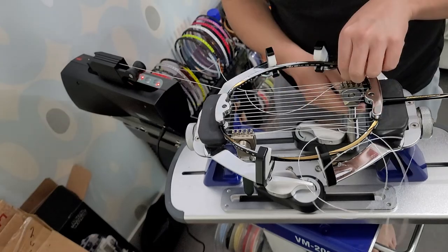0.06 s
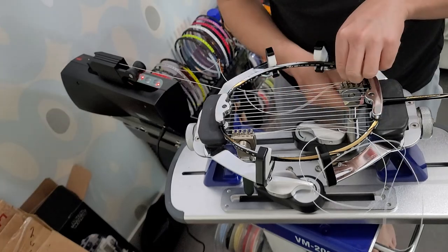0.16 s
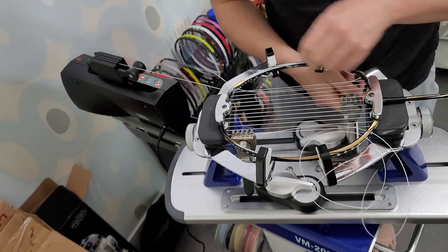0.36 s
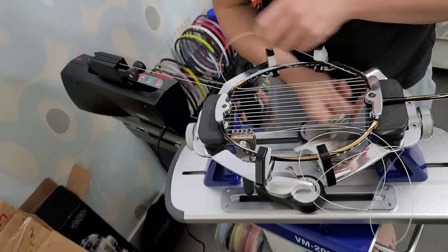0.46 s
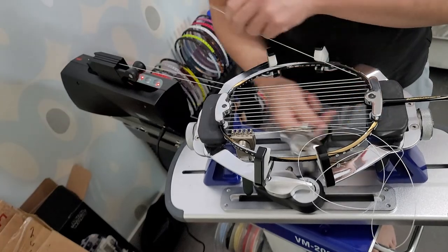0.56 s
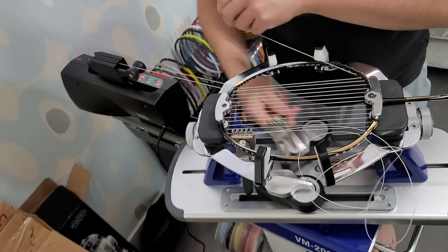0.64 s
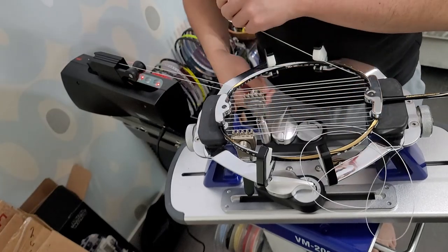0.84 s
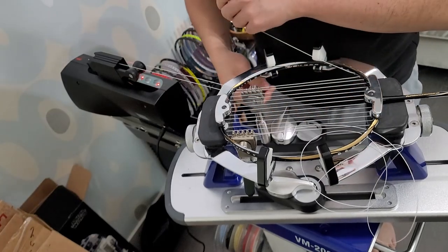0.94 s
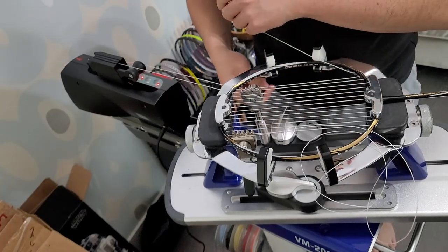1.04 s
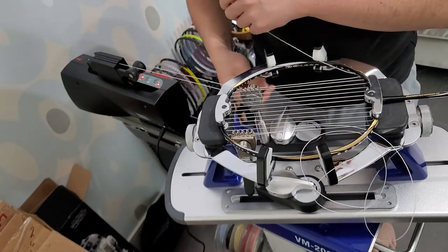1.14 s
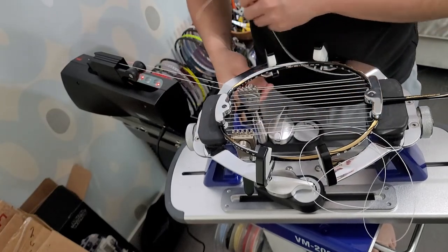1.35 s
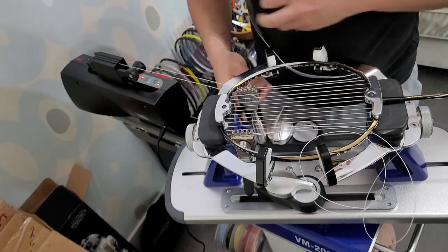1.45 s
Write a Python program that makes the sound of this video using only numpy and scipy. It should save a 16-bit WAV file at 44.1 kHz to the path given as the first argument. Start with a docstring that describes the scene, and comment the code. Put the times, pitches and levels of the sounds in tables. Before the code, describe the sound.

A metal clamp on a racket stringing machine snaps open at about 0.2 seconds, with a brief creak and ring from the racket. Around 0.35 seconds it clacks loudly, drops and rattles until 0.5. A lighter clink comes at 0.6, then soft hand bumps and faint sliding string near 0.8. Small ticks follow until 1.3 seconds, and the string slides again. A low rumble continues in the small hard room.

```python
"""A string clamp on a racket stringing machine is released and moved, in a small hard room.
Over a steady low rumble, string slides through the fingers and the racket creaks. The jaws rub, snap
open, and the racket springs back. The base lock lets go; the clamp drops, rattles on the turntable and
clinks as it is lifted. A hand bumps the racket, the clamp ticks against the strings as it is set again,
and the string slides once more. Impacts ring the modes of each part; friction makes swells of noise."""
import sys
import numpy as np
from scipy import signal
from scipy.fft import rfft, irfft
from scipy.io import wavfile
from scipy.ndimage import uniform_filter1d

SR = 44100
rng = np.random.default_rng(int(sys.argv[2]) if len(sys.argv) > 2 else 0)


def int16_out(signal):
    """Quantize to a 16-bit WAV file."""
    q = np.round(np.clip(np.atleast_2d(signal).T, -1, 1) * 32767)
    wavfile.write(sys.argv[1], SR, q.astype(np.int16))


N = 66150
TIME, FREQ = np.arange(N) / SR, np.fft.rfftfreq(N, 1 / SR)
NEAR_LAG_S, FAR_LAG_S = 0.00014, -0.000615  # delay of the left channel for each end of the racket


def undb(db):
    """The decibel scale: 20 dB is a tenfold amplitude."""
    return 10 ** (np.asarray(db) / 20)


def unit(x):
    """Normalisation: each channel gets an energy of one."""
    return x / np.sqrt(np.sum(x ** 2, axis=-1, keepdims=True))


def fade(t60):
    """Exponential damping: 60 dB in t60 seconds."""
    return np.exp(-np.log(1000) * TIME / max(t60, 1e-4))


def convolve(drive, response):
    """Linear response: the drive convolved with an impulse response."""
    return signal.fftconvolve(np.atleast_2d(drive), np.atleast_2d(response), axes=-1)[:, :N]


def colour(x, points):
    """Minimum-phase filtering through (Hz, dB) points."""
    hz, db = np.array(points).T
    gain = undb(np.interp(np.log(FREQ + 1), np.log(hz), db))
    cepstrum = irfft(np.log(gain), N)
    cepstrum[1:N // 2] *= 2
    cepstrum[N // 2:] = 0
    return irfft(rfft(x) * np.exp(rfft(cepstrum)), N)


def whiten(x, envelope):
    """Spectral whitening of noise under an envelope."""
    x = x * envelope
    for _ in range(2):
        spectrum = rfft(x)
        x = irfft(spectrum / (abs(spectrum) + 1e-12), N) * np.sqrt(envelope)
    return unit(x)


BASS_SHARED_HZ = 270
def share_bass(x):
    """Spatial coherence: long waves reach both channels alike."""
    alike = 1 / (1 + (FREQ / BASS_SHARED_HZ) ** 4)
    left, right = rfft(x)
    return np.array([x[0], irfft(np.sqrt(alike) * left + np.sqrt(1 - alike) * right, N)])


def diffuse():
    """A diffuse field: noise from all around, coherent only in the bass."""
    return share_bass(rng.standard_normal((2, N)))


RISE_S = 0.00057  # time constant of a blow spreading through a part
def body(modes, points, dense_db, dense_t60, split=.036):
    """Modal superposition: clusters of nine close modes beat over a short, dense ring."""
    swell = 1 - np.exp(-(TIME + 1 / SR) / RISE_S)
    dense = whiten(rng.standard_normal((2, N)), swell * fade(dense_t60))
    ring = undb(dense_db) * unit(colour(share_bass(dense), points))
    t = TIME[:N // 3]
    for hz, db, t60 in modes:
        phase = rng.uniform(-np.pi, np.pi, (9, 2, 1)) * min(hz / BASS_SHARED_HZ / 2, 1) ** 2
        offsets_hz = (split * hz + 6) * (np.linspace(-1, 1, 9) + rng.uniform(-.12, .12, 9))
        cluster = np.sin(2 * np.pi * (hz + offsets_hz[:, None, None]) * t + phase).sum(axis=0)
        ring[:, :len(t)] += undb(db) * unit(cluster * (swell * fade(t60))[:len(t)])
    return unit(ring)


def place(x, start, db):
    """Delay and gain: the level is that of a unit energy spread over 10 ms."""
    delayed = np.pad(x, ((0, 0), (int(max(start, 0) * SR), 0)))[:, :N]
    return delayed * undb(db) * np.sqrt(SR / 100)


def blows(hits, chatter_db):
    """Contact force: an impulse, then surface chatter falling by 1/e in each contact time."""
    force = 0
    for start, db, contact_s in hits:
        envelope = np.exp(-TIME / max(contact_s, 1e-4))
        push = undb(chatter_db) * rng.standard_normal((1, N)) / np.linalg.norm(envelope)
        push[0, 0] += 1
        force = force + place(whiten(push, envelope), start, db)
    return force


def rub(swells, points):
    """Friction noise in Gaussian swells, each width a standard deviation."""
    swell = sum(undb(db) * np.exp(-.5 * ((TIME - middle) / width) ** 2) for middle, width, db in swells)
    return swell * unit(colour(diffuse(), points)) * np.sqrt(N)


def locate(x, lag_s, pan_db):
    """Binaural cues: the delay and level of the left channel relative to the right."""
    left = np.interp(TIME - lag_s, TIME, x[0], left=0)
    return np.array([left * undb(pan_db / 2), x[1] * undb(-pan_db / 2)])


# Spectrum of the room noise. Each row: frequency in Hz, level in dB.
RUMBLE_SPECTRUM = [(20, -15.5), (42, -18.5), (68, 4), (100, -16), (200, -7), (400, -8), (800, -15),
                   (1600, -21.5), (3000, -32.5), (6000, -32.5), (8500, -46), (16000, -44)]
def rumble():
    """Stationary noise: a diffuse field, strongest in the bass."""
    return undb(-57) * np.sqrt(N) * unit(colour(diffuse(), RUMBLE_SPECTRUM))


# Slides of the string. Each row: middle in seconds, width in seconds, level in dB.
SLIDE_SWELLS = [(0, 0.048, -51.5), (.79, 0.081, -53), (1.456, 0.069, -56.5)]
# Their spectrum. Each row: frequency in Hz, level in dB.
SLIDE_SPECTRUM = [(100, 11), (300, -11.5), (900, -4.5), (2000, -8), (5500, -12.5), (8500, -22.5),
                  (12000, -24), (16000, -70)]
def string_slides():
    """Sliding friction: the string runs through the fingers."""
    return rub(SLIDE_SWELLS, SLIDE_SPECTRUM)


# Creaks, then the recoil. Each row: start in seconds, level in dB, contact time in seconds.
RACKET_BLOWS = [(.1698, -59.5, .002), (.2052, -49, .005), (.2245, -43, .003), (.2522, -26, 0.0035)]
# Modes of frame and string bed. Each row: frequency in Hz, energy share in dB, t60 in seconds.
RACKET_RESONANCES = [(254.9, -11, 1), (424, -10, 0.5), (798, -7, .12), (1644, -7, 0.081)]
# Their dense ring. Each row: frequency in Hz, level in dB.
RACKET_SPECTRUM = [(150, -24), (400, -2), (1400, 0), (2400, -1), (6000, -6), (12000, -23)]
def racket_recoil():
    """Elastic recoil: the racket creaks, then springs back as the string is freed."""
    force = blows(RACKET_BLOWS, chatter_db=-4.5)
    ring = body(RACKET_RESONANCES, RACKET_SPECTRUM, dense_db=0.5, dense_t60=.03, split=.018)
    return convolve(force, ring)


# Scrapes of the jaws. Each row: middle in seconds, width in seconds, level in dB.
SCRAPE_SWELLS = [(.221, 0.019, -45), (1.0, 0.012, -59)]
# Their spectrum. Each row: frequency in Hz, level in dB.
SCRAPE_SPECTRUM = [(100, -25), (280, -22.5), (430, -1.5), (600, -6), (800, 3.5), (1100, -9), (2500, -20.5),
                   (6000, -32.5), (16000, -56.5)]
def jaw_scrapes():
    """Sliding friction: the jaws rub briefly on the string."""
    return rub(SCRAPE_SWELLS, SCRAPE_SPECTRUM)


# Snaps of the jaws. Each row: start in seconds, level in dB, contact time in seconds.
JAW_BLOWS = [(.2338, -23.5, 0.0029), (.2351, -20.5, 0.0035), (.299, -39, 0.0031)]
# Modes of the jaws. Each row: frequency in Hz, energy share in dB, t60 in seconds.
JAW_RESONANCES = [(850, -19, .03), (2267, -16.5, 0.036), (3060, -17.5, .05), (4435, -4.5, 0.11),
                  (6094, -8, .04)]
# Their dense ring. Each row: frequency in Hz, level in dB.
JAW_SPECTRUM = [(170, -52), (420, -7), (1000, -8.5), (2300, 0.5), (3700, -7.5), (6300, 1), (8200, -13.5),
                (13000, -15), (16000, -24.5)]
def jaw_snap():
    """Impulsive excitation: the jaws snap open and their high modes ring."""
    force = blows(JAW_BLOWS, chatter_db=2.0)
    ring = body(JAW_RESONANCES, JAW_SPECTRUM, dense_db=0.5, dense_t60=0.0094, split=.025)
    return convolve(force, ring)


# Impacts in the lock. Each row: start in seconds, level in dB, contact time in seconds.
LOCK_BLOWS = [(.3414, -21.5, 0.002), (.3518, -15.5, 0.0056), (.3565, -21.5, 0.018), (.4535, -30.5, 0.0017),
              (.457, -31.5, 0.0053)]
# Modes of the lock. Each row: frequency in Hz, energy share in dB, t60 in seconds.
LOCK_RESONANCES = [(785.6, -8, 0.061), (2195, -5.5, 0.02), (2490, -4.5, .035), (3073, -6.5, 0.034),
                   (3470, -6, 0.028), (4760, -14.5, .03)]
# Its dense ring. Each row: frequency in Hz, level in dB.
LOCK_SPECTRUM = [(100, -23.5), (400, -14.5), (1400, -12.5), (2600, -3.5), (5000, -3), (8500, -12),
                 (12000, -10.5), (15500, -13.5)]
def base_lock():
    """Damped vibration: the lock clacks as it lets go and again as it catches."""
    force = blows(LOCK_BLOWS, chatter_db=4.5)
    return convolve(force, body(LOCK_RESONANCES, LOCK_SPECTRUM, dense_db=4.0, dense_t60=0.015))


# Impacts of the rattle. Each row: start in seconds, level in dB, contact time in seconds.
RATTLE_BLOWS = [(.3705, -19, 0.0021), (.382, -23.5, 0.011), (.401, -24, 0.0048), (.411, -29, 0.0039),
                (.424, -24.5, 0.0053), (.4565, -22, 0.0048), (.479, -33.5, 0.01)]
# Turntable modes they ring. Each row: frequency in Hz, energy share in dB, t60 in seconds.
RATTLE_RESONANCES = [(374, -16.5, 0.028), (930, -15, .04)]
# The dense ring. Each row: frequency in Hz, level in dB.
RATTLE_SPECTRUM = [(30, -11), (70, -1), (125, -1), (200, -19), (370, -4), (520, 0.5), (850, 0.5),
                   (1500, 0.5), (3000, -0.5), (5500, 2), (8200, -10), (16000, -19)]
def clamp_rattle():
    """Intermittent contact: the clamp chatters on the turntable as it settles and slides."""
    force = blows(RATTLE_BLOWS, chatter_db=7.5)
    return convolve(force, body(RATTLE_RESONANCES, RATTLE_SPECTRUM, dense_db=-0.5, dense_t60=0.024))


# Impacts of the landing. Each row: start in seconds, level in dB, contact time in seconds.
DROP_BLOWS = [(.3709, -12, 0.0029), (.38, -16, 0.0027)]
# Modes of the turntable. Each row: frequency in Hz, energy share in dB, t60 in seconds.
PLATE_RESONANCES = [(377.4, -21.5, 0.079), (789, -4, 0.059), (907, -4.5, 0.06), (1088, -11, 0.053),
                    (1224, -11.5, 0.035), (12540, -12, .04)]
# Its dense ring. Each row: frequency in Hz, level in dB.
PLATE_SPECTRUM = [(40, -11), (70, 5.5), (170, -32), (380, -17), (600, -11.5), (1000, 5), (2000, -4),
                  (5500, -1), (8200, -15), (16000, -23.5)]
def turntable_knock():
    """Plate resonance: the turntable knocks hollowly as the clamp lands."""
    plate = body(PLATE_RESONANCES, PLATE_SPECTRUM, dense_db=-3, dense_t60=0.027, split=.014)
    return convolve(blows(DROP_BLOWS, chatter_db=0.5), plate)


# Clinks. Each row: start in seconds, level in dB, contact time in seconds, gain of the modes in dB.
CLINK_BLOWS = [(.613, -32.5, 0.0011, -0.5), (0.7107, -46, 0.0053, -9)]
# Modes of the clamp. Each row: frequency in Hz, energy share in dB, t60 in seconds.
CLINK_RESONANCES = [(1082, -9.5, 0.038), (2440, -11.5, 0.029), (3084, -12.5, 0.03), (5960, -1.5, 0.025)]
# Its dense ring. Each row: frequency in Hz, level in dB.
CLINK_SPECTRUM = [(200, -19), (1000, 3), (1600, 3), (3300, 9), (5000, -2), (6800, 5.5), (8200, -7),
                  (16000, -13)]
def clamp_clinks():
    """Free vibration: the lifted clamp rings after each light contact."""
    clinks = 0
    for start, db, contact_s, modes_db in CLINK_BLOWS:
        modes = [(hz, share + modes_db, t60) for hz, share, t60 in CLINK_RESONANCES]
        ring = body(modes, CLINK_SPECTRUM, dense_db=-1, dense_t60=0.017)
        clinks = clinks + convolve(blows([(start, db, contact_s)], chatter_db=5.5), ring)
    return clinks


# Bumps of the hand. Each row: start in seconds, level in dB, contact time in seconds.
BUMP_BLOWS = [(.728, -47.5, 0.018), (.76, -51, 0.027), (1.132, -52.5, 0.0074)]
# Their spectrum. Each row: frequency in Hz, level in dB.
BUMP_SPECTRUM = [(30, -11), (70, 0), (130, -14), (260, 12.5), (450, -2.5), (850, 1.5), (1400, -8),
                 (4000, -27), (16000, -27)]
def hand_bumps():
    """Soft impact: the hand's force, spread over time, draws a dull thud from the racket."""
    thud = unit(colour(diffuse() * fade(0.16), BUMP_SPECTRUM))
    return convolve(blows(BUMP_BLOWS, chatter_db=26), thud)


# Modes rung by the nudge. Each row: frequency in Hz, energy share in dB, t60 in seconds.
NUDGE_RESONANCES = [(1381, -2.5, 0.064), (1708, -2, 0.064), (3370, -7.5, 0.036), (4910, -8.5, 0.039)]
# Taps of the clamp's teeth. Each row: start in seconds, level in dB.
TAPS = [(1.1026, -41.5), (1.2538, -47.5)]
# Modes they ring. Each row: frequency in Hz, energy share in dB, t60 in seconds.
TAP_RESONANCES = [(1300, -6, 0.058), (1897, -5.5, 0.0094), (3600, -9.5, 0.013), (4070, -8, 0.17),
                  (4880, -12, 0.014)]
# Dense ring of nudge and taps. Each row: frequency in Hz, level in dB.
TICK_SPECTRUM = [(200, 2.5), (900, -17), (1500, 3), (2700, 0.5), (3900, 3), (5800, 0.5), (7500, -13.5),
                 (15000, -50)]
def string_ticks():
    """Impulse responses: the clamp meets the strings with a hollow nudge, then two light taps."""
    nudge = body(NUDGE_RESONANCES, TICK_SPECTRUM, dense_db=-2.5, dense_t60=0.009)
    tap = body(TAP_RESONANCES, TICK_SPECTRUM, dense_db=-4.0, dense_t60=0.02)
    return place(nudge, start=.8405, db=-43) + sum(place(tap, start, db) for start, db in TAPS)


def flatten(x, bins):
    """Equalisation: dividing by the smoothed spectrum removes broad humps and keeps the fine grain."""
    spectrum = rfft(x)
    return irfft(spectrum / np.sqrt(uniform_filter1d(abs(spectrum) ** 2, bins, axis=-1)), N)


# Reverberation times of the room. Each row: frequency in Hz, t60 in seconds.
ROOM_DECAYS = [(250, 0.56), (800, 0.39), (2000, 0.45), (5000, 0.47), (9000, 0.37), (16000, 0.31)]
ROOM_DB, TAIL_DB, EARLY_T60_S, BUILD_UP_S = 1, -4, 0.18, 0.002
def room(x):
    """Reverberation: close reflections from table and walls, then a tail that is longest in the bass."""
    early = unit(diffuse() * undb(4.6 * rng.standard_normal(N)) * fade(EARLY_T60_S))
    noise, tail = rfft(diffuse()), 0
    centres, decays = np.array(ROOM_DECAYS).T
    for t60, weights in zip(decays, np.eye(len(centres))):
        band = np.interp(np.log(FREQ + 1), np.log(centres), weights)
        tail = tail + irfft(noise * band, N) * fade(t60)
    build_up = (1 - np.exp(-(TIME / BUILD_UP_S) ** 2)) * (TIME < 1)
    response = flatten(early + undb(TAIL_DB) * unit(tail), bins=90) * build_up
    return undb(ROOM_DB) * convolve(x, unit(response))


def scene():
    """Superposition: the clamp's direct sound and its echoes, over dry handling sounds and the rumble."""
    release = locate(jaw_snap() + racket_recoil(), NEAR_LAG_S, pan_db=-1)
    base = locate(base_lock() + clamp_rattle(), NEAR_LAG_S, pan_db=0)
    clamp = release + base + locate(clamp_clinks(), NEAR_LAG_S, pan_db=-1)
    knock = locate(turntable_knock(), NEAR_LAG_S, pan_db=-1)
    ticks = locate(string_ticks(), FAR_LAG_S, pan_db=-2)
    direct = clamp + knock + ticks + rumble()
    # The turntable faces the listener and feeds the room less; the ticks are a little drier too.
    echoes = room(clamp + undb(-6) * knock + undb(-1) * ticks)
    return direct + echoes + hand_bumps() + string_slides() + jaw_scrapes()


TOP_HZ = 15900
def record(dry):
    """Clipping and band limiting: the sound is held within full scale, then low-passed steeply."""
    low_pass = signal.ellip(8, .2, 70, TOP_HZ, fs=SR, output="sos")
    return signal.sosfilt(low_pass, np.clip(dry, -1, 1))


dry = scene()
out = record(dry)
int16_out(out)
```